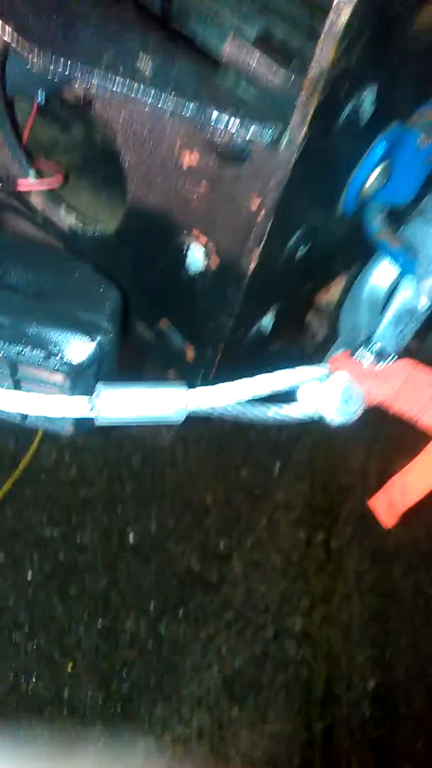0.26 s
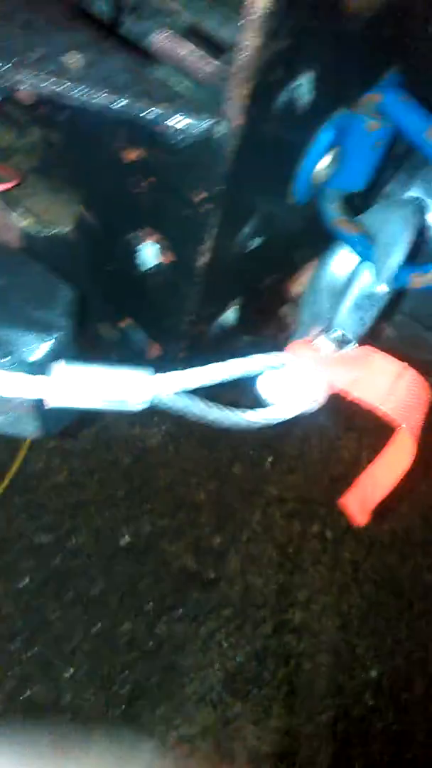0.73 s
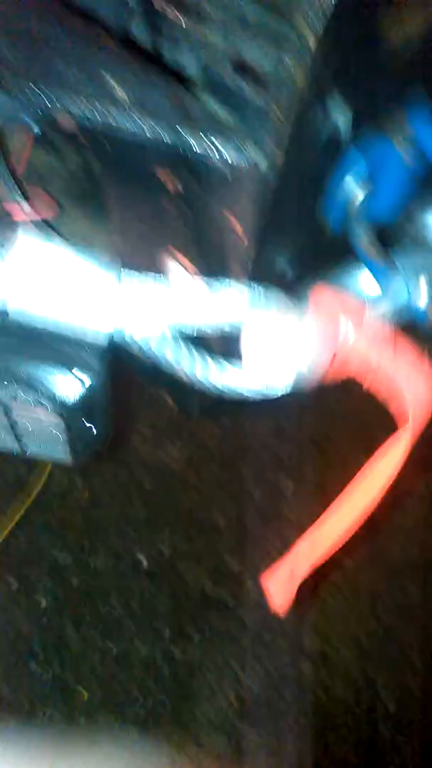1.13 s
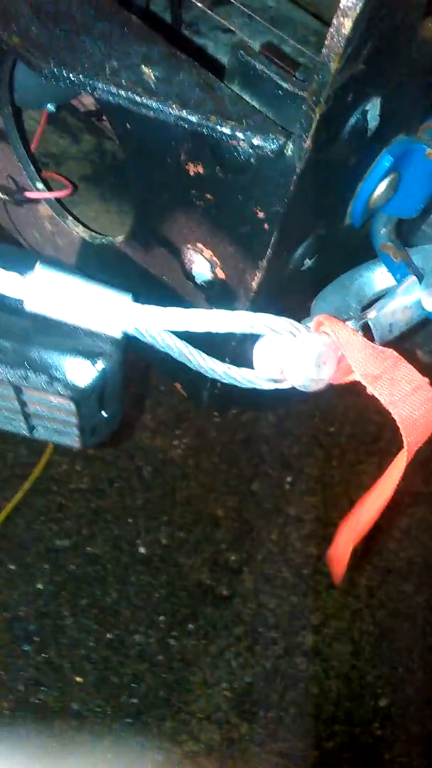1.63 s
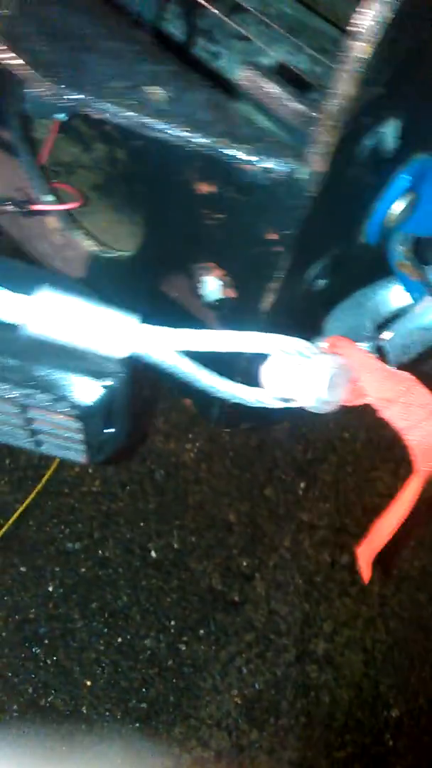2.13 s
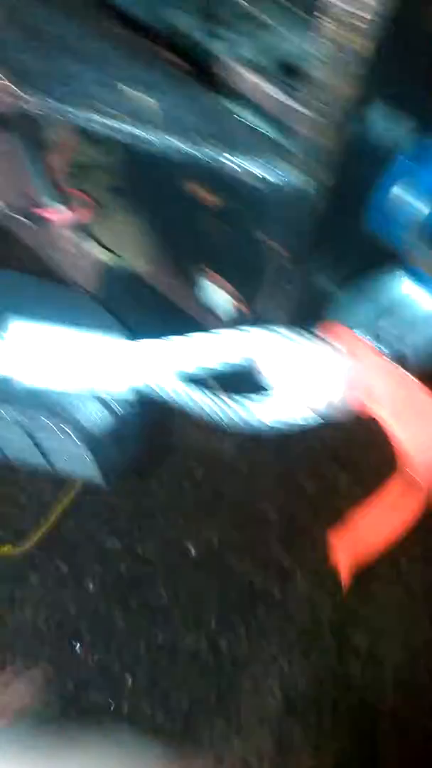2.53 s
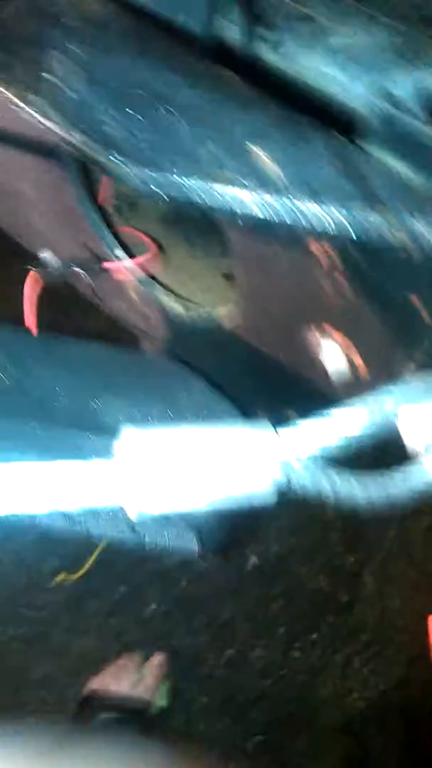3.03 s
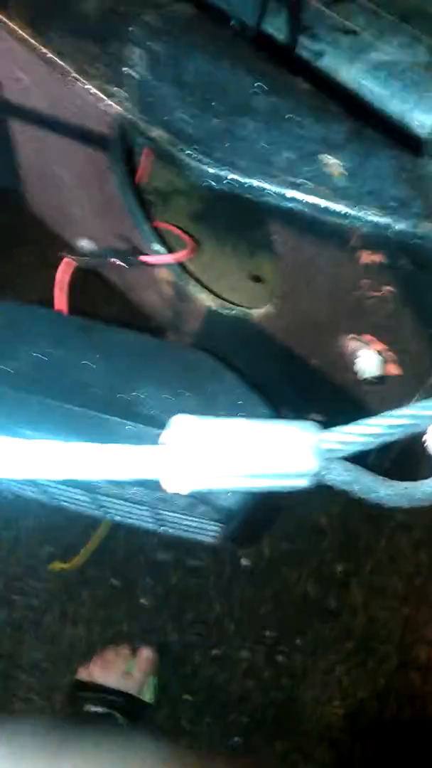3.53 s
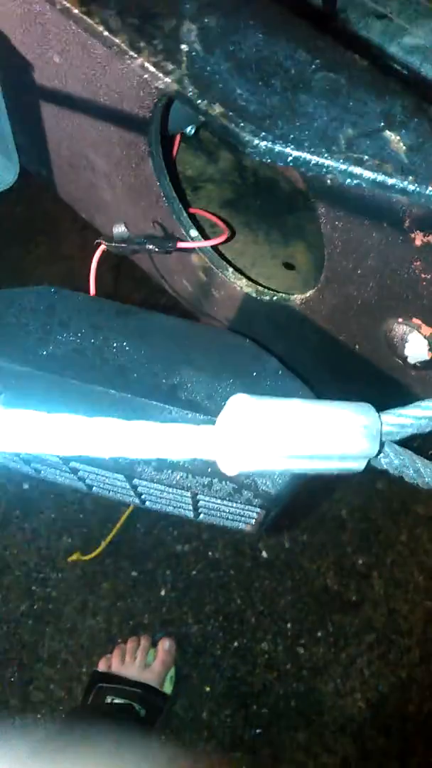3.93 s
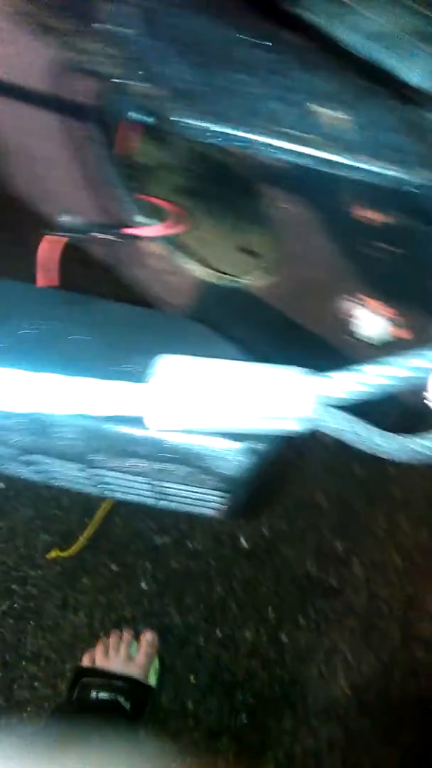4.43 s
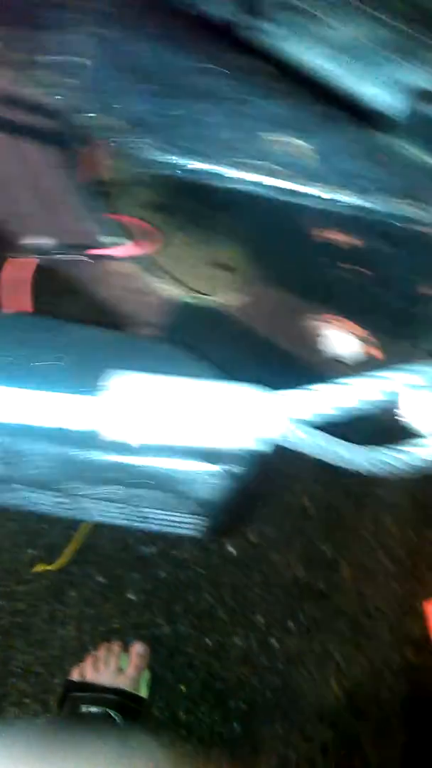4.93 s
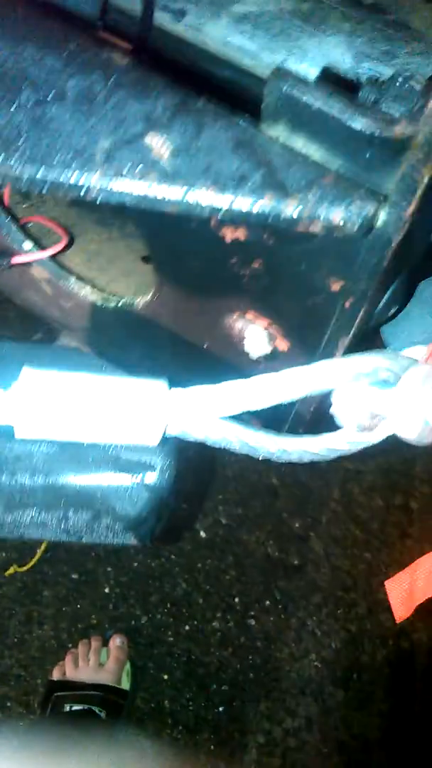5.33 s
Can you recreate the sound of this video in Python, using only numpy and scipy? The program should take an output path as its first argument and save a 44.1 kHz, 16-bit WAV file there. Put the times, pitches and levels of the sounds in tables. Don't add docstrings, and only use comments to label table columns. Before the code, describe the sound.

A quiet outdoor night with faint traffic rumble and soft hiss, heard in mono by a phone very close to a vehicle winch. Slight cable scrapes come at 0.3-0.5 s, then from 0.75 s a rough scrape, a sharp jerk and bright shackle clank near 0.8 s, followed by hook clinks and light pawl ticks until about 1.2 s. Almost nothing but a tiny snap at 1.5 s. From 2.1 to 2.9 s a second flurry: rattling hook, ticks, rubbing strands, the strongest clank at 2.47 s. Small dry crackles follow around 3.1 s. At 3.6 s a faint switch click and a loud, bouncing contactor clack start the motor. It whirs rapidly upward, buzzing briefly, then settles by about 4.5 s into a high, harsh whine with brush rasp, gear grinding and low rumble. Metal clinks at 4.4 s, a snap at 4.6 s, and a loud crunch at 5.44 s; the motor still runs at the end.

```python
import sys
import numpy as np
from scipy import signal
from scipy.fft import rfft, irfft, next_fast_len
from scipy.io import wavfile
from scipy.ndimage import uniform_filter1d

SR = 44100
rng = np.random.default_rng(int(sys.argv[2]) if len(sys.argv) > 2 else 0)


def inscribe(sig):
    pcm = np.round(np.clip(np.atleast_2d(sig).T, -1, 1) * 32767)
    wavfile.write(sys.argv[1], SR, pcm.astype(np.int16))


def boost_factor(decibels):
    exponent = np.asarray(decibels, float) / 20
    return 10 ** exponent


N = 245857
TIME = np.arange(N) / SR
COARSE = TIME[::32]

BARS = 29
MESH = 10.588
START_S, TAUT_S = 3.64, 4.41
SLOW_S = .265

# t/s, drag on the bar rate/Hz, rasp level/dB, mount shake/dB, brush bite/dB
EFFORT = [(3.64, 59.5, -31.5, -17, -2.5), (3.685, -190, -32.5, -9, 2), (3.725, 0, -29, -6, 5.5),
          (3.77, 1, -29, -9, -10), (3.96, 5, -27.5, -2.5, -9), (4.04, 5.5, -25.5, -1.5, -8),
          (4.06, 5, -27.5, -5.5, 0), (4.28, 0, -27, 3.5, 3), (4.31, -1, -28, 4, -8),
          (4.43, -11, -25, 5, -2.5), (4.55, -15, -25.5, -1, 0.5), (4.72, -34, -26, 2.5, 2),
          (4.84, -28, -26.5, 3.5, 3), (4.95, -15, -25, 0.5, 1), (5.12, -3, -24.5, 0, -0.5),
          (5.3, -7.5, -25, -12, 0.5), (5.45, -3, -23.5, -10.5, -1.5), (5.58, 10.5, -25.5, -22, -15)]
# f/Hz, width/Hz, level/dB
FRAME = [(83.6, 7.4, 22), (232, 42, 19), (341, 20, 17.5), (435.7, 12.6, 21.5), (911, 214, 24),
         (1300, 220, 11.5), (2304, 220, 16), (2518, 83, 14.5), (3040, 340, 24), (3900, 450, 17.5),
         (4560, 200, 14), (4970, 290, 16.5), (7000, 320, 14), (7450, 430, 9)]
# slack level/dB, taut level/dB
BAR_TONES = [(-49, -52), (-58.5, -52), (-53, -54), (-55.5, -55.5)]
# slack level/dB, taut level/dB
MOUNT_TONES = [(-62.5, -61.5), (-53.5, -57.5), (-73, -57.5), (-64.5, -59.5), (-63, -63.5), (-64.5, -57)]
ORDERS = [MESH / 9, 2 * MESH / 9, 4 * MESH, 10, 11, 12, 17, 36, 54, 55, 56, 57, 59, 60, 61, 63, 70.4, 72,
          77, 82, 85, 26, 28, 30]
ORDERS_DB = [-22, -34, -18, -21, -18, -25, -43, -27, -29, -16, -19.5, -22, -11, -31, -20, -18.5, -12.5, -13,
             -17, -21, -28.5, -43, -26.5, -28]
# f/Hz, level per Hz/dB
RASP = [(760, -41), (1300, -15), (2040, -11.5), (2400, -10), (2660, -9), (3440, -10.5), (3590, -11),
        (3940, -9.5), (4880, -4.5), (5600, -3.5), (6150, -0.5), (6750, -11), (7400, -9.5), (7850, -16.5),
        (8600, -16), (10000, -28), (13000, -61), (22000, -120)]
# f/Hz, level per Hz/dB
SPARKS = [(8000, -25), (10500, -2), (12500, -3), (14500, -11), (15700, -22)]
# f/Hz, level per Hz/dB
RUMBLE = [(24, -51), (40, -15), (91, -0.5), (152, -14), (209, 2.5), (296, -8), (334, -1.5), (433, -1.5),
          (467, -4), (642, -6), (966, -3), (1180, -12.5), (1500, -9), (1950, -15.5), (3300, -120)]
# f/Hz, level re rasp/dB, t60/s
HOUSING = [(6300, -13.5, 0.02), (1510, -31, 0.094), (978, -15, 0.021), (5560, -17.5, 0.025),
           (4535, -20.5, 0.03), (3680, -22.5, 0.05), (6116, -13, 0.029), (6440, -20, 0.016),
           (7200, -22, .012)]
# f/Hz, level/dB, t60/s
COVER = (1455, 0, 0.11)
# t/s, level/dB
JOLTS = [(4.03, 1.6), (4.2, 4.1), (4.55, 2.4), (4.6, 4.3), (4.725, 3), (4.83, 1.5), (5.0, 3), (5.075, 5.3),
         (5.105, 4.6), (5.24, 5.9), (5.32, 3.1), (5.42, 5.1), (5.56, 1.9)]

# f/Hz, level/dB, t60/s
CONTACTOR = [(400, -12, .06), (564, -7.5, 0.078), (2400, -11, 0.055), (3400, -32, 0.013), (4410, 7, 0.012),
             (3950, -1, .02), (5850, 8, 0.018), (6180, 5, 0.016), (8200, -25, 0.007), (9400, -5, 0.01),
             (12200, -24, 0.06)]
# t/s, peak level/dB
BOUNCES = [
    (3.6335, -7),
    (3.6352, -2),
    (3.6365, -2),
    (3.6385, -7),
    (3.641, -5),
    (3.6448, -12),
    (3.651, -20),
]

# t/s, hold/s, hiss level/dB, body re hiss/dB, top re hiss/dB
SCRAPES = [(0.34, 0.024, -52.5, 6, -8), (0.402, 0.018, -54, 13.5, -0.5), (0.493, 0.053, -54, 10.5, -3.5),
           (0.75, 0.05, -47, 12, -4), (0.819, 0.015, -33, 3, -3.5), (0.84, 0.013, -27.5, -0.5, -32),
           (0.867, 0.045, -50, 18, -30), (0.935, 0.02, -41.5, 3, -17), (0.968, 0.044, -53.5, 10.5, -6),
           (1.027, 0.062, -48.5, 8, -12), (1.138, .008, -52.5, 0, -27), (1.21, 0.07, -64, 13.5, -15),
           (1.878, .004, -64.5, -2, -6), (2.116, 0.013, -57.5, 10.5, -12), (2.197, 0.032, -51, 6.5, -8.5),
           (2.283, 0.041, -39, 2.5, -15.5), (2.365, 0.084, -52.5, 10, -11), (2.466, 0.042, -49.5, 9.5, -5),
           (2.517, 0.091, -55, 9.5, -11), (2.597, .016, -45, -4, -4.5), (2.614, 0.015, -37.5, -3, -7),
           (2.635, 0.027, -40, -7, -2.5), (2.742, 0.019, -51, 10.5, -5), (2.78, 0.054, -65, 20, 0),
           (2.863, 0.07, -70.5, 16, 11), (3.105, .006, -53, -26, -0.5), (3.127, 0.19, -68.5, -13, 3.5)]
# f/Hz, level per Hz/dB
SCRAPE_HISS = [(880, -8.5), (1500, -5), (2060, -5), (2380, -4), (2590, 1), (4440, -6.5), (6500, -9),
               (8450, -87), (14300, -120)]
# f/Hz, level per Hz/dB
SCRAPE_TOP = [(2650, -38), (4500, -5.5), (7330, -10.5), (8030, -12.5), (8880, -16), (13500, -25.5),
              (16000, -45)]
# f/Hz, level per Hz/dB
SCRAPE_BODY = [(59, -37), (100, 0.5), (300, 1.5), (528, 4.5), (589, 4.5), (659, 2.5), (965, -4.5),
               (1050, -3.5), (1900, -20.5), (2470, -71), (4180, -120)]
# f/Hz, level/dB, t60/s
STEEL = [(580.4, 0, 0.15), (1000, 3, 0.064), (2357, 5, 0.034), (3000, 5, 0.05), (3560, -13, 0.023),
         (4590, -4, 0.047), (5400, -17, .03)]
# t/s, hold/s, low level/dB, middle level/dB, high level/dB
RATTLES = [(0.747, 0.055, -58, -46, -47), (0.929, 0.026, -42, -43, -36), (1.02, .07, -60, -64, -55),
           (1.14, 0.02, -63, -66, -70), (1.28, 0.015, -74, -72, -71), (2.2, 0.024, -51, -53, -56),
           (2.28, 0.039, -43, -40, -44), (2.325, 0.027, -56, -64, -49), (2.368, 0.038, -53, -53, -50),
           (2.42, 0.018, -56, -58, -57), (2.505, 0.038, -44, -52, -50), (2.71, 0.012, -51.5, -46, -61),
           (2.76, 0.036, -62, -57, -68), (2.825, 0.024, -67, -64, -67)]
# which of the three levels, f/Hz, level/dB, t60/s
RATTLE_LINES = [(0, 1870, -4, .03), (0, 2140, -0.5, 0.024), (0, 2360, -6, 0.033), (1, 2995, -1, 0.03),
                (1, 3500, -9, 0.027), (1, 2800, -8.5, 0.034), (2, 4590, 1, 0.087), (2, 6740, -12, 0.12)]

# f/Hz, level/dB, t60/s
HOOK = [(2995, 11, 0.041), (1856, 5.5, 0.026), (6740, -4, 0.13), (9370, 7, 0.28), (4590, 6, 0.078),
        (2310, -8.5, 0.043), (2045, -0.5, 0.029)]
# t/s, peak level/dB, then the share of each of the first three modes/dB
HOOK_HITS = [(0.9268, -24.5, -1.5, 4, -5), (2.207, -47, 5, -7, -9), (2.28, -37, 0, 1, -4),
             (2.289, -33, -14, 2, -14), (2.303, -33, -12, -8, -11), (2.3154, -43, 15, 5, -15),
             (2.372, -36, -1, -2, -9), (2.507, -35, 19, -7, -15), (2.511, -36, -4, 7, -11),
             (2.5349, -35, 20, 20, -3), (2.824, -51, 6, 13, -9), (4.431, -15.5, -11, -25, -26),
             (4.436, -14, 7.5, 9.5, -26)]
# f/Hz, level/dB, t60/s
SHACKLE = [(5700, -4, 0.1), (5840, -25, .06), (3070, -18, 0.03), (6640, -26, 0.041), (9600, -27, 0.013)]
# t/s, peak level/dB, freedom to ring 0-1
SHACKLE_HITS = [(0.819, -7.5, 0.68), (0.9118, -35, 1), (2.47, -13.5, 0.76), (2.504, -37, .4),
                (2.5431, -27, 0.27), (2.566, -43, .4), (2.5995, -35, 0.6), (2.621, -31, .4),
                (2.633, -32, 0.5), (2.653, -28, .3), (2.664, -31, 0.4), (2.734, -43, .5), (2.708, -35, 0.7),
                (2.7518, -30, 0.6)]
# f/Hz, level/dB, t60/s
PAWL = [(6240, 4.5, 0.013), (5030, -15, 0.0049), (7400, 0, 0.0039), (7900, -3, 0.0049)]
# t/s, peak level/dB
PAWL_TICKS = [(0.9487, -26), (0.9931, -29), (1.042, -22), (1.083, -28), (2.1235, -40.5), (2.211, -28),
              (2.313, -23), (2.3625, -32), (2.414, -23), (2.462, -25), (2.525, -26), (2.577, -33),
              (2.708, -25), (2.7538, -21.5), (2.926, -40)]
# t/s, peak level/dB, centre f/Hz, t60/s, width over centre
SNAPS = [(0.846, -14, 3510, 0.027, 1.04), (1.2125, -39.5, 3030, 0.012, 1.3),
         (1.514, -42.5, 3820, 0.012, 1.3), (2.179, -37, 4650, 0.015, 0.49), (2.226, -45, 4610, 0.012, 0.9),
         (2.471, -23, 5700, 0.021, 1.1), (2.5757, -32, 4500, .01, .9), (2.616, -24, 3000, 0.014, 1.4),
         (2.785, -34, 3560, 0.015, 1.5), (0.765, -23, 4800, 0.013, .4), (2.421, -40, 3000, .012, .8),
         (3.1465, -38, 3000, 0.013, 1.1), (3.081, -45, 2300, .012, .5), (3.047, -45, 2680, 0.0082, 0.56),
         (3.3937, -54, 3590, 0.015, 0.9), (3.454, -49.5, 3560, 0.014, 0.24),
         (3.5189, -58, 2850, 0.015, 0.9), (4.594, -13, 6180, 0.019, 1.2)]
# t/s, peak level/dB, centre f/Hz, t60/s, width over centre
CRUNCHES = [(0.3396, -52, 2780, 0.039, 0.93), (0.4865, -37, 4280, 0.13, 0.23),
            (0.7476, -27.5, 4300, 0.079, 0.55), (1.1378, -43, 2830, 0.035, 0.56),
            (3.103, -40, 3910, 0.049, 1.6), (3.146, -38.5, 5500, 0.093, 1.3),
            (5.4367, -3.5, 6300, 0.035, 2.3)]
# t/s, peak level/dB, centre f/Hz, t60/s, width over centre
SWITCH = (3.6095, -29, 5200, .026, 1.6)
# t/s, peak level/dB, centre f/Hz, t60/s, width over centre
JERK = (.8035, -9, 4600, .02, .6)
# t/s, peak level/dB, f/Hz, t60/s
PINGS_AND_KNOCKS = [(.7653, -25, 5300, .014), (.778, -28.5, 710, .05), (.8471, -14, 3550, 0.014),
                    (.8476, -15, 4600, .016), (.853, -20, 978, 0.071), (.856, -21, 2380, 0.076),
                    (.872, -25, 583, 0.15), (1.11, -39, 504, 0.041), (1.138, -43, 2820, .05),
                    (1.2127, -37.5, 590, 0.018), (1.514, -40, 3770, 0.015), (2.288, -33.5, 1030, .04),
                    (2.308, -28.5, 1040, 0.053), (2.6077, -31, 4400, 0.017), (2.6145, -28, 954, 0.037),
                    (2.644, -25, 2350, 0.02), (3.103, -41, 2200, .025), (3.147, -45, 2400, 0.013),
                    (3.185, -44, 2780, 0.042), (5.44, -24.5, 2220, 0.021), (5.461, -17, 970, 0.028),
                    (.523, -39, 3120, .04), (.49, -41, 4590, .04), (.905, -33, 580, 0.055), (1.072, -46, 500, .05),
          (2.215, -40, 504, 0.12), (2.395, -43, 500, .08), (2.283, -34, 500, 0.1), (2.334, -33, 475, 0.087),
          (2.312, -35, 3800, .06), (2.366, -41, 1970, .06), (2.616, -31, 1260, 0.044),
          (2.618, -31, 1710, .04), (2.62, -30.5, 683, 0.056), (2.645, -37, 1650, .03),
          (2.755, -40, 970, .08), (2.755, -42, 1330, .04), (2.795, -44, 960, .08), (2.83, -41.5, 956, .08),
          (2.785, -45, 3560, .04), (2.81, -39, 327, 0.085), (2.845, -38, 400, 0.082),
          (2.847, -39, 109, 0.08), (4.441, -29, 924, .15), (4.56, -26, 917, 0.12), (4.83, -21.5, 215, .1),
          (4.97, -24, 242, 0.087), (5.04, -28, 365, 0.088), (5.46, -26.5, 664, 0.1)]

# f/Hz, level per Hz/dB
TRAFFIC = [(12, -60), (30, -9), (81, 4), (139, -0.5), (162, -7), (203, 2.5), (249, -8.5), (510, -13),
           (539, -17), (729, -12), (848, -13.5), (931, -15), (1800, -24), (2340, -62), (3960, -120)]
# f/Hz, level per Hz/dB
HISS = [(1060, -37), (1800, -5), (3140, -5.5), (3410, -5.5), (4210, -8), (5800, -3), (7220, -10.5),
        (10000, -12.5), (13000, -13), (16000, -15)]


def motor():
    drag_hz, rasp_db, shake_db, bite_db = curves(EFFORT)
    on = np.maximum(TIME - START_S, 0)
    bar_hz = 2534.4 + drag_hz - 924.2 * np.exp(-on / .053) - 1108.7 * np.exp(-on / SLOW_S)
    turns = np.cumsum(bar_hz / BARS * (on > 0)) / SR
    out = whine(bar_hz, turns, shake_db, bite_db) + weak_lines(bar_hz, turns, rasp_db)
    out += brush_rasp(turns, rasp_db) + rumble(turns, rasp_db, on)
    return out * np.clip(on / 0.0038, 0, 1)


def tone(order, turns, db, wobble_db):
    level = np.sqrt(2) * boost_factor(db + wobble_db * walk(19))
    return level * np.sin(2 * np.pi * order * turns + 0.29 * walk(30))


def whine(bar_hz, turns, shake_db, bite_db):
    taut = np.clip((TIME - TAUT_S) / 0.051 + .5, 0, 1)
    turn_hz = np.interp(COARSE, TIME, bar_hz) / BARS

    def framed(order, slack_db, taut_db):
        power = 1
        for hz, width, db in FRAME:
            detune = 2 * (order * turn_hz - hz) / width
            power = power + boost_factor(2 * db) / (1 + detune ** 2) ** 2
        lift = np.interp(TIME, COARSE, np.sqrt(power))
        return lift * tone(order, turns, slack_db + taut * (taut_db - slack_db), 2.0)

    bar_orders = (BARS, 2 * BARS, 3 * BARS, BARS - 2)
    first, second, third, side = (framed(k, *db) for k, db in zip(bar_orders, BAR_TONES))
    out = boost_factor(bite_db) * (first + side)
    out += boost_factor(3.9 * (1 - taut) * walk(24.92)) * second
    out += third * (bar_hz / bar_hz[-1]) ** 2
    mount_orders = (3, 4, 5, MESH, MESH + 1)
    out += boost_factor(shake_db) * sum(framed(k, *db) for k, db in zip(mount_orders, MOUNT_TONES[1:]))
    return out + boost_factor(0.17 * shake_db) * framed(1, *MOUNT_TONES[0])


def weak_lines(bar_hz, turns, rasp_db):
    speed_db = 120 * np.log10(bar_hz / bar_hz[-1])
    return sum(tone(k, turns, db + rasp_db + speed_db, 2.8) for k, db in zip(ORDERS, ORDERS_DB))


def brush_rasp(turns, rasp_db):
    rasp = .55 * unit(per_turn(turns, 4., 2.5)) + .84 * unit(grit(N, 2.5))
    jolt_db = jolts()
    out = boost_factor(rasp_db - 4.0 + 0.17 * jolt_db + 1.65 * walk(60)) * colour(rasp, RASP)
    out += boost_factor(rasp_db - 37.5) * colour(grit(N, 1.5), SPARKS)
    for k, (hz, db, t60) in enumerate(HOUSING, start=1):
        mode = unit(ring(np.roll(rasp, shift=1999 * k), [(hz, 0, t60)]))
        level_db = rasp_db + db + 3.2 * walk(60) + 1.1 * walk(8)
        out += boost_factor(level_db + jolt_db * (hz > 2000)) * mode
    buzz = np.clip(np.minimum(TIME - 3.74, 4.0 - TIME) / 0.047, 0, 1)
    return out + boost_factor(rasp_db - 15) * buzz * unit(ring(rasp, [COVER]))


def jolts():
    swell_s = 0.017
    swells = sum(db * np.exp(-((COARSE - s) / swell_s) ** 2) for s, db in JOLTS)
    return np.interp(TIME, COARSE, swells)


def rumble(turns, rasp_db, on):
    shudder = 0.46 * unit(per_turn(turns, 5., 3.3)) + 1.04 * rng.standard_normal(N)
    rumble_db = -7 + 2 * np.exp(-on / SLOW_S)
    return boost_factor(rasp_db + rumble_db + walk(40)) * colour(shudder, RUMBLE)


def per_turn(turns, lasts, spread_db):
    table = grit((200, 400), spread_db)
    row = turns / lasts
    index = row.astype(int)
    blend = np.pi / 2 * (row % 1)
    angle = ((turns % 1) * table.shape[1]).astype(int)
    return np.cos(blend) * table[index, angle] + np.sin(blend) * table[index + 1, angle]


def contactor():
    out = np.zeros(N)
    for s, db in BOUNCES:
        crack = band(burst(0.005, size=4000), [3000, 7500])
        add(out, s, db, unit(ring(burst(0.0024, size=4000), CONTACTOR)) + .5 * unit(crack))
    return signal.sosfilt(signal.butter(2, 12500, fs=SR, output="sos"), out)


def scrapes():
    hiss_db, body_db, top_db = np.transpose(SCRAPES)[-3:]
    fade, body_fade = 491, 346
    rub = grit(N, 4.4)
    steel = ring(drags(SCRAPES, fade, hiss_db) * rub, STEEL)
    hiss = drags(SCRAPES, fade, hiss_db + 1.0) * colour(rub, SCRAPE_HISS)
    body = drags(SCRAPES, body_fade, hiss_db + body_db - 5.0) * colour(rub, SCRAPE_BODY)
    top = drags(SCRAPES, fade, hiss_db + top_db + 3.0) * colour(rub, SCRAPE_TOP)
    out = boost_factor(hiss_db.max() + 2.0) * steel / np.abs(steel).max()
    for layer in (hiss, body, top):
        out += boost_factor(1.9 * walk(120)) * layer
    return out


def rattles():
    catches = unit(grit(N, 6.6))
    pushes = [drags(RATTLES, 900., db) * catches for db in np.transpose(RATTLES)[-3:]]
    out = 0
    for which, hz, db, t60 in RATTLE_LINES:
        p = pole(hz, t60)
        line = signal.lfilter([1], [1, -p], pushes[round(which)]).imag
        out += boost_factor(db) * np.sqrt(2 - 2 * abs(p) ** 2) * line
    return out


def drags(rows, fade_db_per_s, levels_db):
    swell = 0
    for (s, hold, *_), db in zip(rows, levels_db):
        grip_db = 2300 * np.clip(s - COARSE, 0, 1)
        slip_db = fade_db_per_s * np.clip(COARSE - s - hold, 0, 1)
        swell = swell + boost_factor(db - grip_db - slip_db)
    return np.interp(TIME, COARSE, swell)


def clinks():
    out = np.zeros(N)
    hook(out)
    shackle(out)
    for s, db in PAWL_TICKS:
        add(out, s, db + 1, pawl())
    strands(out)
    for s, db, hz, t60 in PINGS_AND_KNOCKS:
        add(out, s, db, struck([(hz, 0, t60)], 0.71))
    return signal.sosfilt(signal.butter(3, 7730, fs=SR, output="sos"), out)


def hook(out):
    for s, db, *shares in HOOK_HITS:
        shares = shares + [-27] + [0] * len(HOOK)
        modes = [(hz, level + share, t60) for (hz, level, t60), share in zip(HOOK, shares)]
        add(out, s, db + 6.0, struck(modes, 4.3, since=int(s * SR) / SR))


def shackle(out):
    for s, db, free in SHACKLE_HITS:
        modes = [(hz, level, t60 * free) for hz, level, t60 in SHACKLE]
        add(out, s, db + 0.13, struck(modes, 0.37))


def pawl():
    t = np.arange(2000) / SR
    sweep_hz, sweep_s, sweep_t60_s = 2200, .0012, .008
    cycles = PAWL[0][0] * t + sweep_hz * sweep_s * np.exp(-t / sweep_s)
    flick = boost_factor(-60 * t / sweep_t60_s) * np.sin(2 * np.pi * (cycles - cycles[0]))
    return struck(PAWL, 0.25, len(t)) + flick


def strands(out):
    size = 12000
    for s, db, hz, t60, width in SNAPS + CRUNCHES + [SWITCH, JERK]:
        edges = np.clip([hz / (1 + width), hz * (1 + width)], 100, SR / 2.2)
        onset = 1 - np.exp(-np.arange(size) / SR / (0.2 * t60))
        add(out, s, db, band(onset * burst(t60, size), edges))


def struck(modes, contact_ms, size=12000, since=0.):
    t = np.arange(size) / SR
    lines = sum(boost_factor(db - 60 * t / t60) * np.sin(2 * np.pi * hz * (t + since)) for hz, db, t60 in modes)
    return lines * np.clip(1000 * t / contact_ms, 0, 1)


def night():
    traffic = boost_factor(-50 + 0.09 * walk(3.9)) * colour(rng.standard_normal(N), TRAFFIC)
    return traffic + boost_factor(-62.5 + .3 * walk(3)) * colour(rng.standard_normal(N), HISS)


def unit(x):
    return x / np.sqrt(np.mean(x ** 2))


def colour(x, shape):
    hz, db = np.transpose(shape)
    size = next_fast_len(N, True)
    freqs = np.maximum(np.arange(size // 2 + 1) * SR / size, 1)
    gain = boost_factor(np.interp(np.log(freqs), np.log(hz), db, left=-99, right=-99))
    return unit(irfft(rfft(x, size) * gain, size)[:N])


def band(x, edges):
    return signal.sosfilt(signal.butter(2, edges, "band", fs=SR, output="sos"), x)


def curves(rows):
    s, *columns = np.transpose(rows)
    return [np.interp(TIME, s, c) for c in columns]


def walk(rate):
    steps = rng.standard_normal(int(N / SR * rate * 8) + 9)
    steps = uniform_filter1d(uniform_filter1d(steps, size=8), size=8)
    return np.interp(TIME * rate * 8, np.arange(len(steps)), unit(steps))


def grit(shape, spread_db):
    excess = np.minimum(rng.exponential(size=shape), np.pi)
    return rng.standard_normal(shape) * boost_factor(spread_db * excess)


def burst(t60, size):
    return rng.standard_normal(size) * np.exp(-np.log(1000) * np.arange(size) / SR / t60)


def pole(hz, t60):
    return np.exp((2j * np.pi * hz - np.log(1000) / t60) / SR)


def ring(push, modes):
    out = 0
    for hz, db, t60 in modes:
        line = signal.lfilter([1], [1, -pole(hz, t60)], push).imag
        out = out + boost_factor(db) * line / np.abs(line).max()
    return out


def add(out, s, db, sound):
    i = int(s * SR)
    out[i:i + len(sound)] += (boost_factor(db) * sound / np.abs(sound).max())[:N - i]


def scene():
    return np.tile(motor() + contactor() + scrapes() + clinks() + night() + rattles(), (2, 1))


def roll_off(x):
    return signal.sosfilt(signal.butter(12, 15820, fs=SR, output="sos"), x)


def record(dry):
    rounded = np.tanh(.6 * dry) / .6
    mix = signal.sosfilt(signal.ellip(8, .2, 60, 15800, fs=SR, output="sos"), rounded)
    return roll_off(mix)


dry = scene()
out = record(dry)
inscribe(out)
```